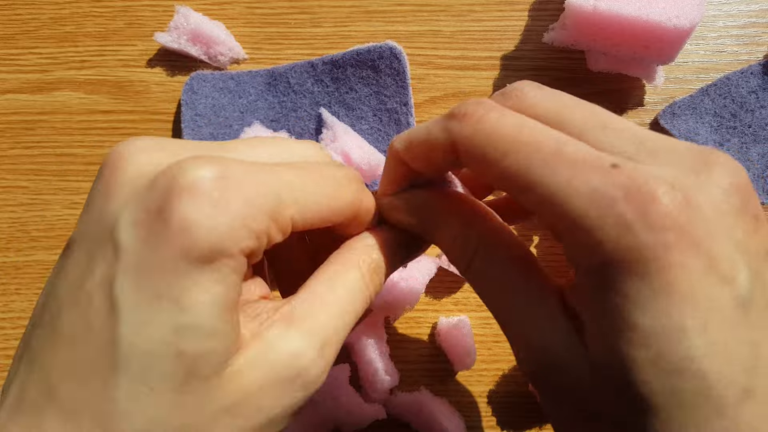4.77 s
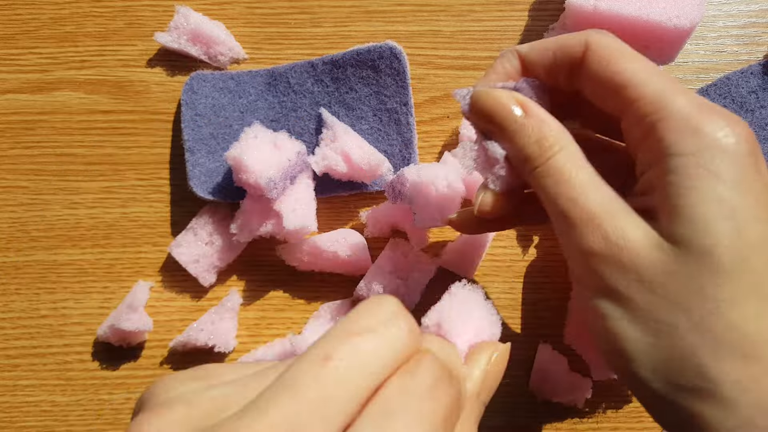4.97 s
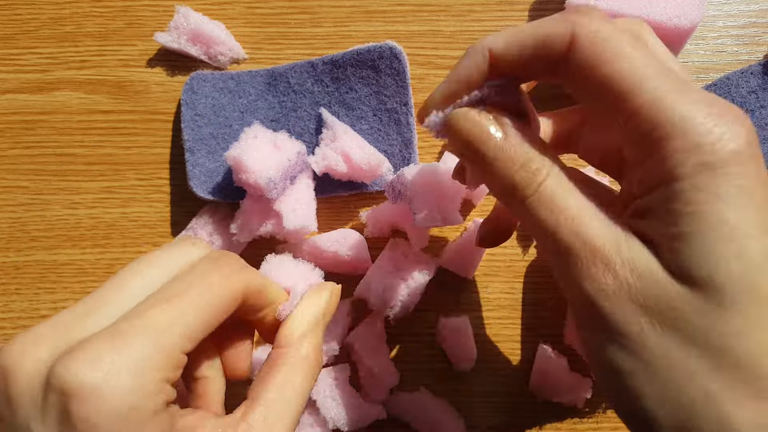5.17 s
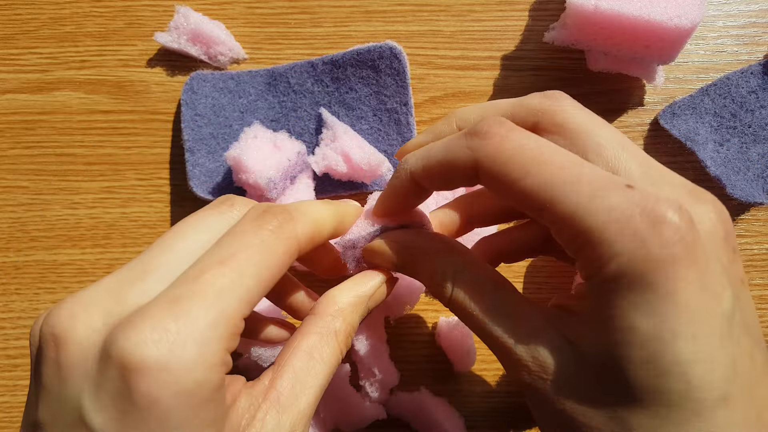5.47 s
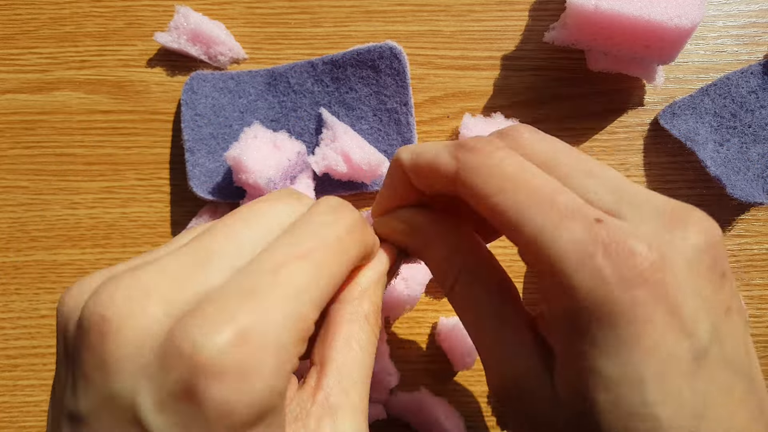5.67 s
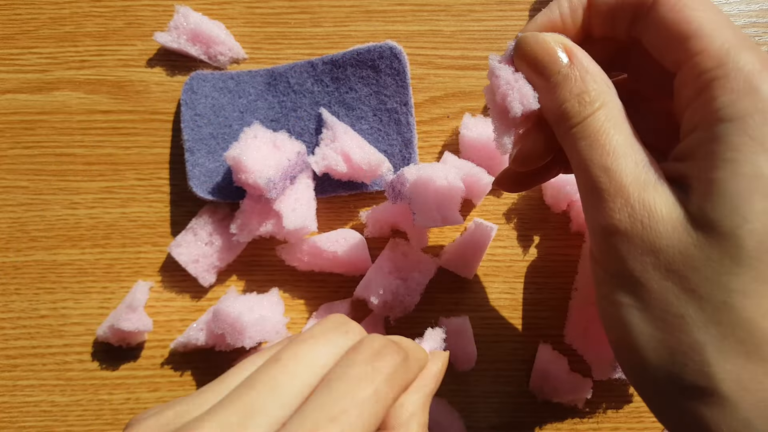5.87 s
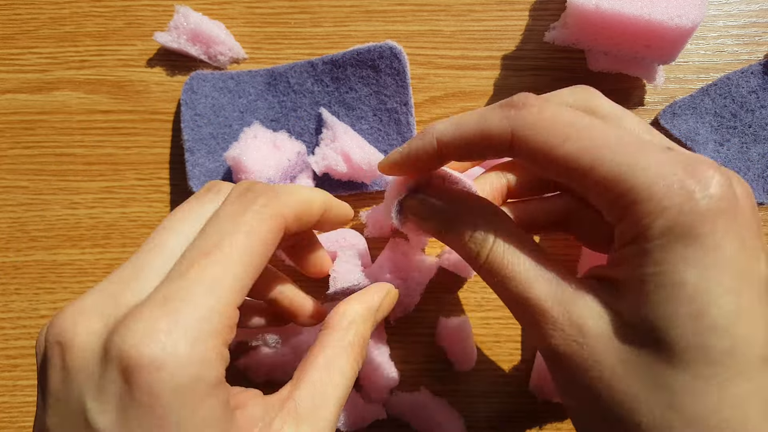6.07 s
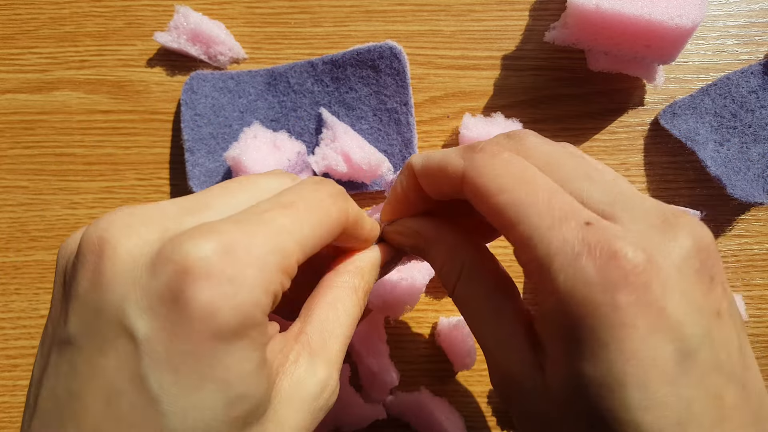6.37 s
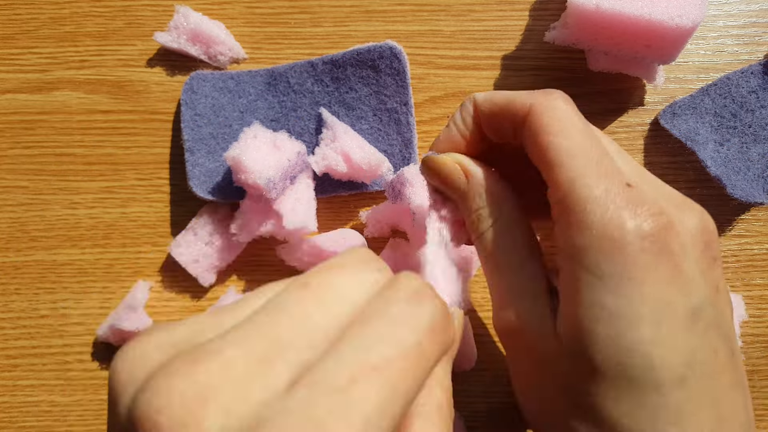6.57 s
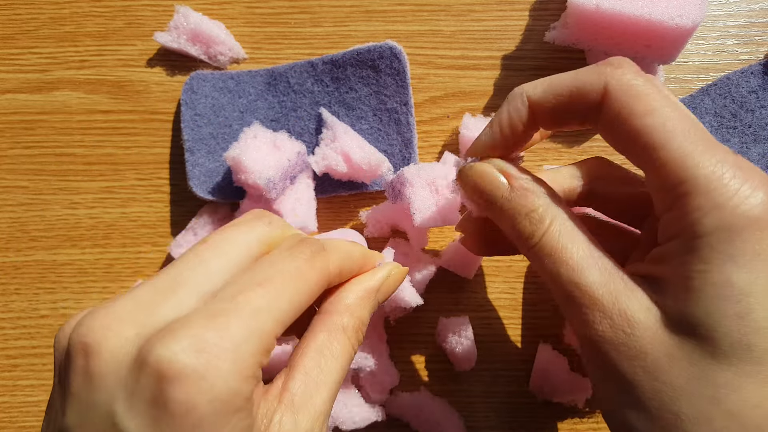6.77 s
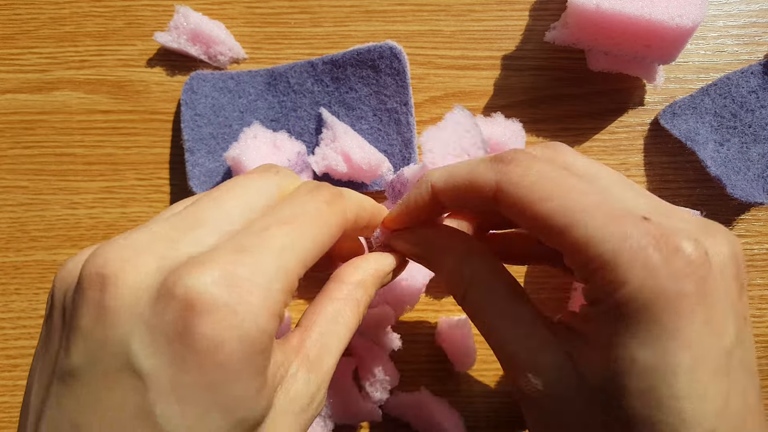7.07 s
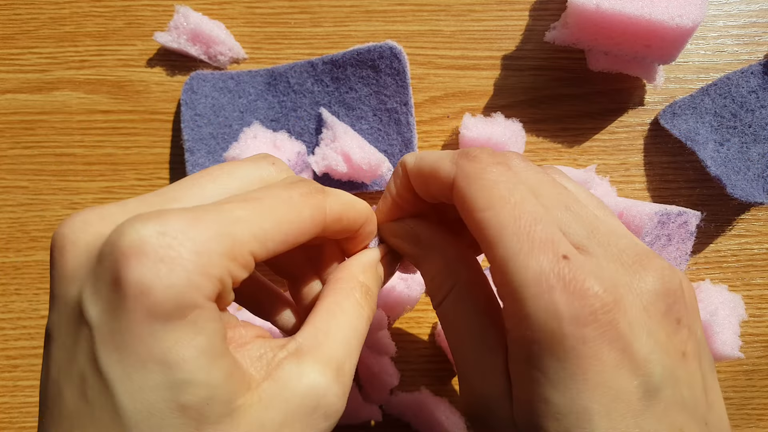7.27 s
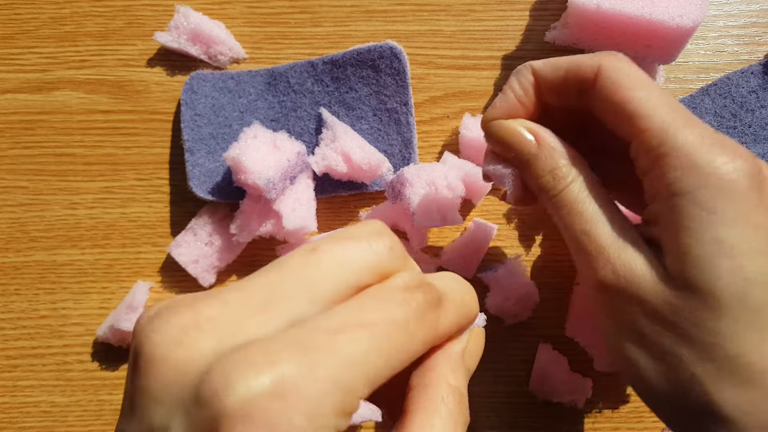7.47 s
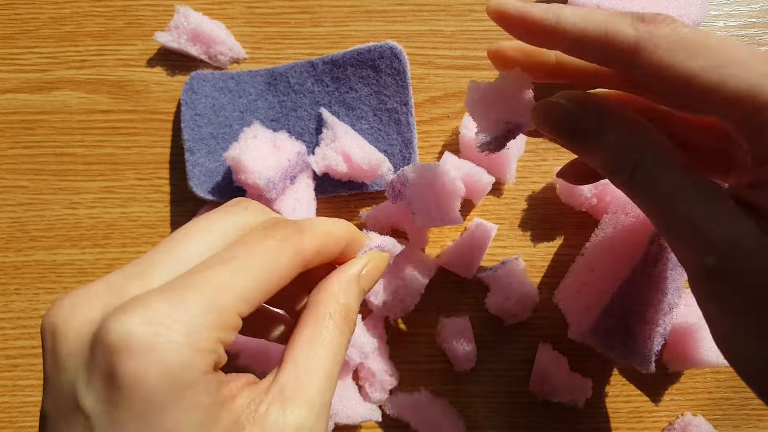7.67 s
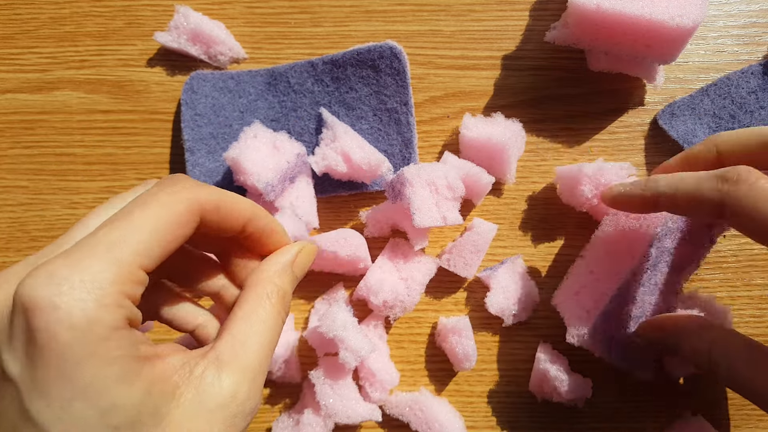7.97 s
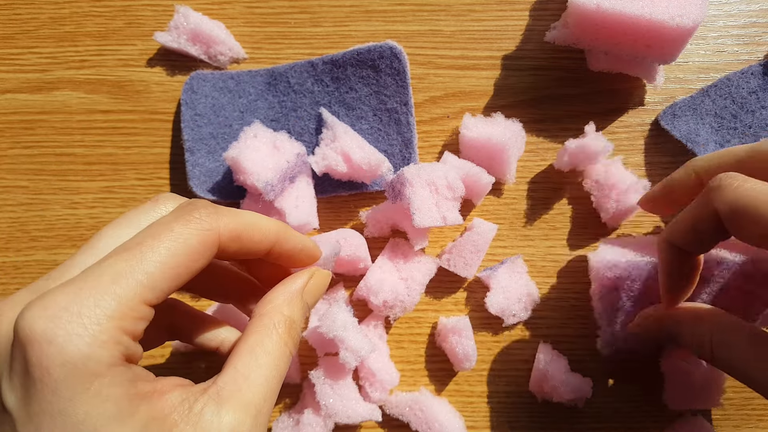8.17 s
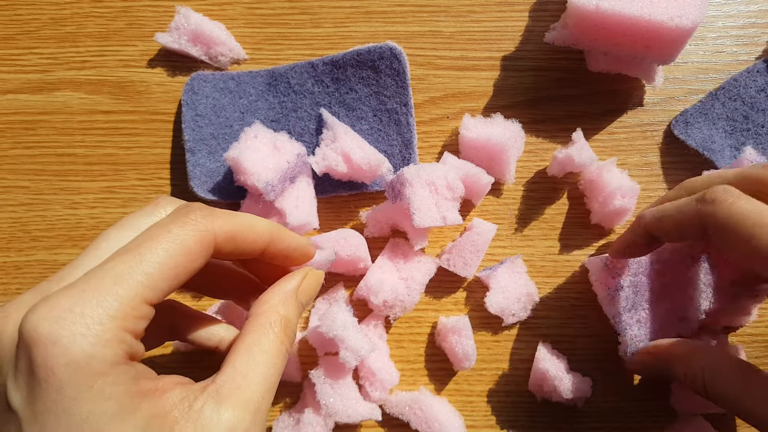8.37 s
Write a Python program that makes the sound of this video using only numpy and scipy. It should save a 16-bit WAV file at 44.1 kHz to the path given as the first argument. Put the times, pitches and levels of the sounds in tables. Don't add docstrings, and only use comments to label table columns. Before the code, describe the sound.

Very close stereo microphone in a small quiet room. Hands tear dry sponge foam: a cluster of loud, coarse rips comes first, each a dense crackle of snapping cells closing with a low dull pop. Later rips are shorter, brighter and more spaced out. Between them fingers squeeze, rustle and lightly tap the pieces. Faint hiss and a distant low motor hum stay underneath.

```python
import sys
import numpy as np
from scipy import signal
from scipy.io import wavfile

SR = 44100
rng = np.random.default_rng(int(sys.argv[2]) if len(sys.argv) > 2 else 0)


def to_wav(sig):
    pcm = np.clip(np.atleast_2d(sig), -1, 1) * 32767
    pcm = np.round(pcm).astype(np.int16)
    wavfile.write(sys.argv[1], SR, pcm.T)


def rack_gain(trim_db):
    fader = np.asarray(trim_db, float)
    return 10 ** (fader / 20)


N = 376173

# f/Hz, level/dB
HISS_SPECTRUM = [(12, -29), (20, -18), (44, -11), (101, -9), (176, -16.5), (267, -16), (395, -18.5),
                 (815, -21), (5270, -32), (9200, -37), (10600, -35), (13200, -37), (15600, -31)]
HISS_DB = -52.5
# f/Hz, correlation/1
HISS_LIKENESS = [(60, 0.78), (240, 0.084), (950, -0.0088), (3770, -0.35), (15000, -0.13)]
# t/s, f/Hz, level/dB
MOTOR = [(2.5, 124, -68), (2.8, 124, -58), (3.9, 122, -57), (4.1, 111, -59), (4.45, 108, -60),
         (4.65, 113, -57), (4.8, 112, -75), (5.75, 107, -68), (6.1, 124, -56), (6.3, 115, -55),
         (6.55, 116, -54), (6.9, 127, -59), (7.25, 109, -60), (7.5, 102, -68), (7.8, 116, -56),
         (8.0, 121, -61), (8.25, 111, -55), (8.53, 126, -57)]
# f/Hz, width/Hz, level/dB
DRONES = [(44.2, 4, -60), (90.5, 2.5, -60), (262, 30, -63)]
ROOM_T60_S, ROOM_DB, WALL_CUT_HZ = 0.26, -23, 14500
# f/Hz, width/Hz, boost/dB
HOLLOWS = [(797, 64, -12), (1100, 24, -20), (2210, 46, 1), (2772, 100, -2), (3570, 26, -0.5),
           (4200, 37, -5), (4800, 85, -7), (8560, 1950, -8.5)]

# f/Hz, level per Hz/dB
CRACKLE_SPECTRUM = [(65, -18.5), (110, -5), (270, 2.5), (375, -3.5), (576, 3.5), (803, 7), (1010, 5.5),
                    (2210, -7), (2510, -11.5), (2840, -3.5), (3870, -5.5), (4120, -7.5), (5170, -9.5),
                    (12100, -10), (15500, -4.5)]
REGISTERS_HZ = [15500, 4500, 1400, 600, 85]
PATH_SPREAD = [0.93, 1, 1.8, 3.0]
STRUCK_SHARE = [.6, .2, .15, 0.25]

# t at full strength/s, rise/s, hold/s, level/dB, darkness/dB
RUSTLES = [(0.0, .011, .002, -49.5, 10.5), (.84, 0.037, 0.066, -64.5, 8.5), (1.255, 0.083, 0.018, -63, 8.5),
           (1.492, 0.024, 0.015, -50, 3.5), (1.54, 0.028, 0.066, -52.5, 6), (2.39, 0.068, .005, -55, 1),
           (2.49, 0.032, 0.012, -53.5, -3.5), (2.745, 0.013, 0.065, -57, 9), (2.86, 0.037, 0.025, -63, 12),
           (3.54, 0.052, 0.0059, -56, 3.5), (3.68, 0.016, 0.042, -58, 14.5),
           (4.35, 0.084, 0.0088, -61, 7.5), (4.45, 0.065, 0.0038, -56.5, 4),
           (4.615, 0.031, 0.0085, -57, 5.5), (4.68, 0.038, 0.037, -54, 3.5), (5.35, .031, 0.0093, -69, 5),
           (5.52, 0.063, 0.11, -59.5, 8.5), (6.26, 0.032, 0.064, -61, 5), (6.88, 0.019, 0.034, -53, -3),
           (6.98, .021, .005, -56, 2), (7.084, 0.019, 0.0046, -58.5, 6.5), (8.1, 0.02, .005, -65, 0),
           (8.33, 0.014, 0.019, -60, 5), (8.41, 0.012, 0.17, -59.5, 10.5)]
# t at full strength/s, rise/s, hold/s, level/dB, darkness/dB
GRIPS = [(.106, 0.021, 0.042, -61.5, 6.5), (.99, 0.055, .005, -54.5, 0), (1.055, 0.05, 0.023, -52, -0.5),
         (1.72, 0.11, 0.18, -57, -1), (2.95, 0.097, 0.2, -62.5, 0), (3.37, 0.036, 0.039, -46.5, -5),
         (3.455, 0.036, 0.0087, -55.5, 1), (3.78, 0.059, 0.063, -59, -1), (4.155, 0.087, 0.053, -53.5, -15),
         (4.22, 0.025, 0.036, -49.5, -5), (4.89, 0.18, 0.0036, -52, -10), (5.235, 0.033, 0.068, -48.5, -4),
         (5.74, 0.073, 0.067, -53.5, -13), (6.045, 0.021, 0.055, -48, -4), (6.45, 0.16, 0.23, -56, -3),
         (6.845, 0.03, .002, -41.5, -7.5), (7.3, 0.07, 0.18, -58, -5.5), (7.692, 0.0081, 0.0059, -43, -8),
         (7.755, 0.0072, 0.0076, -47.5, -14.5), (8.172, 0.034, 0.042, -49, -0.5)]
# share/1, offset/dB
RUSTLE_DARKENING = [(0.051, 1.5), (0.44, -0.16), (0.89, -2), (0.71, -5)]
# share/1, offset/dB
GRIP_DARKENING = [(0.072, 0), (0.94, 0.5), (0.76, -3), (0.99, -3)]
SETTLE_DB_PER_S, RESTING_DB = 330, -69

# t/s, peak level/dB, f/Hz
TAPS = [(1.045, -36, 1090), (1.492, -37, 825), (2.391, -38, 786), (2.475, -42, 1100), (2.499, -54, 740),
        (2.746, -37.5, 510), (2.795, -35, 886), (3.394, -26, 780), (3.695, -35.5, 1160), (4.612, -47, 1140),
        (4.71, -40, 880), (5.544, -37, 1010), (5.595, -36, 1140), (5.627, -29, 1200), (6.108, -35, 900),
        (6.18, -37.5, 930), (6.843, -32, 856), (6.973, -35.5, 1100), (7.08, -39, 1100), (7.379, -38.5, 644),
        (8.413, -49, 730)]
# t/s, length/s, level/dB, f/Hz
SQUEAK = [(.109, .035, -54, 4200)]
# t/s, length/s, level/dB, f/Hz
RUBS = [(0.692, 0.0045, -45, 3600), (0.828, 0.02, -55, 2490), (0.854, 0.012, -50, 2200),
        (0.875, 0.033, -57, 2250), (1.49, 0.026, -49, 1170), (1.492, 0.0085, -45, 1940),
        (1.509, 0.005, -42, 1960), (1.519, 0.011, -50, 1170), (1.594, 0.017, -54, 1170),
        (1.759, 0.022, -46, 13200), (2.387, 0.01, -56, 2780), (2.39, 0.0065, -48, 1270),
        (2.473, 0.0073, -52, 1070), (2.737, 0.028, -44.5, 503), (2.755, 0.01, -48, 810),
        (2.786, 0.026, -49, 1170), (2.876, 0.011, -50, 900), (3.366, 0.013, -41, 13200),
        (3.367, 0.01, -50, 8560), (3.678, 0.042, -45, 1100), (4.237, 0.014, -50, 1170),
        (4.612, 0.006, -50, 3050), (4.612, 0.03, -48.5, 1190), (4.688, 0.004, -48, 4670),
        (4.688, 0.004, -53, 2770), (4.696, 0.036, -47, 895), (5.306, 0.0057, -56, 3630),
        (5.523, 0.031, -49, 1080), (5.589, 0.02, -52, 1190), (5.614, 0.007, -50, 3350),
        (5.624, 0.012, -47, 1180), (5.767, 0.005, -48, 12110), (5.773, 0.005, -54, 2800),
        (6.106, 0.011, -53, 820), (6.514, 0.004, -51, 8560), (6.72, 0.067, -54.5, 2280),
        (7.428, 0.004, -57.5, 8560), (7.755, 0.012, -54, 7000), (7.757, 0.007, -45, 13200),
        (8.165, 0.077, -49, 2760), (8.311, 0.006, -53, 2510), (8.44, 0.03, -44.5, 734),
        (8.458, 0.013, -46.5, 2760), (6.845, 0.067, -51, 820), (6.97, .035, -55, 1100),
        (7.072, .025, -58, 1060)]
# t/s, length/s, level/dB, f/Hz
STRANDS = [(0.17, 0.029, -34, 3670), (0.222, 0.028, -26.5, 500), (0.244, 0.026, -25, 2160),
           (0.254, 0.024, -27.5, 820), (0.268, 0.024, -26, 2840), (0.537, 0.058, -32, 3560),
           (0.56, 0.016, -26.5, 2840), (0.731, 0.024, -37, 8560), (0.762, 0.0084, -11, 830),
           (0.763, 0.007, -37, 8560), (0.764, 0.0046, -26, 4750), (0.766, 0.0039, -15.5, 2000),
           (1.832, 0.01, -31, 2820), (1.854, 0.035, -28, 2140), (1.855, 0.018, -25, 693),
           (1.883, 0.028, -27, 767), (1.884, 0.028, -27.5, 1470), (1.935, 0.0054, -36, 5090),
           (2.006, 0.023, -30, 1150), (2.058, 0.016, -23, 2900), (2.062, 0.025, -49, 9340),
           (2.08, 0.0069, -21, 855), (2.082, 0.006, -20.5, 1750), (2.082, 0.006, -21, 3520),
           (3.11, 0.015, -30, 7460), (3.134, 0.012, -30, 9300), (3.146, 0.027, -30.5, 4280),
           (3.162, 0.01, -25.5, 990), (3.167, 0.014, -28.5, 2200), (3.171, 0.018, -26.5, 451),
           (3.891, 0.005, -28.5, 4530), (3.907, 0.007, -24, 7750), (3.919, 0.0065, -25, 2850),
           (3.919, 0.012, -24, 4500), (3.943, 0.036, -28, 2730), (3.96, 0.0066, -23, 1510),
           (3.974, 0.012, -23.5, 1230), (4.975, 0.012, -24, 9150), (4.977, 0.012, -35, 4720),
           (5.012, 0.045, -33, 6900), (5.04, 0.0074, -29.5, 820), (5.046, 0.0077, -30, 2710),
           (5.864, 0.014, -35, 2840), (5.862, 0.015, -26, 1080), (6.615, 0.012, -37, 7850),
           (6.662, 0.022, -38, 8560), (6.679, 0.0067, -27, 1080), (6.842, 0.022, -42, 12110),
           (7.516, 0.0061, -32.5, 1560)]

# t/s, peak level/dB, f/Hz
SNAPS = [(0.1575, -17, 3540), (0.1708, -23, 3920), (0.178, -16, 3420), (0.216, -7, 1810), (0.231, -7, 1950),
         (0.3099, -14, 2600), (0.4586, -27, 2970), (0.4675, -30, 1100), (0.5369, -11, 3570),
         (0.7175, -29, 3500), (0.7327, -10.5, 2660), (1.4927, -28, 2040), (1.784, -18, 11500),
         (1.797, -6, 11500), (1.81, -8, 8850), (2.0834, -0.5, 2700)]
# t/s, peak level/dB, f/Hz
CHUNK_SNAPS = [(3.0941, -27, 9390), (3.107, -19, 9610), (3.1237, -2, 9340), (3.8723, -20, 6470),
               (3.8826, -4.5, 11600), (3.8925, -8, 9600), (4.9219, -21, 11500), (4.9387, -21, 9220),
               (4.959, -20.5, 9230), (4.963, -5, 9230), (4.9778, 0, 9300), (5.767, -23, 9150),
               (5.7937, -16, 9150), (5.8076, -2, 11500), (5.811, -19, 9500), (5.82, -7, 9500),
               (5.831, -4.5, 9100), (6.4435, -18.5, 9500), (6.478, -25, 9060), (6.5146, -22, 8540),
               (6.538, -18.5, 8800), (6.5622, -25, 10100), (6.5745, -28, 9500), (6.5814, -13, 10200),
               (6.591, -19, 7800), (6.6214, -4, 9900), (6.8425, -8, 11400), (7.4098, -29, 8500),
               (7.4288, -26, 7800), (7.441, -33, 9500), (7.448, -35, 9000), (7.4641, -14, 9500),
               (7.494, -21, 3580), (7.693, -15.5, 7750)]
# t/s, peak level/dB, centre f/Hz
CRACKS = [(.193, -26, 890), (.4436, -26, 1800), (.485, -24.5, 3000), (5.788, -29.5, 2000),
          (.6928, -21, 3500), (.7666, -1, 1800), (.7678, -10, 1000), (1.9926, -20, 2500),
          (2.0073, -21, 1200), (2.0462, -20, 1400), (2.475, -41, 1500), (3.9204, -2, 4700),
          (4.612, -29, 2010), (5.738, -31, 2500), (5.854, -14, 795), (6.0435, -24.5, 2000),
          (6.539, -31, 2400), (7.4288, -31, 3500), (7.4387, -34, 2000), (7.456, -26, 2000),
          (8.098, -34.5, 2700)]
TICK_ATTACK_S = 0.00021

# t/s, peak level/dB, f/Hz, relative knock level/dB, ring t60/s
POPS = [(0.7675, -1.5, 223, -31, 0.033), (0.7684, -8, 331, -23.5, 0.031), (1.851, -27, 129.4, -19.5, 0.043),
        (1.915, -28, 168, -20, 0.083), (1.936, -23, 248, -10, 0.046), (0.306, -22, 380, -10, 0.022),
        (1.8856, -18.5, 192, 6, 0.019), (2.018, -15.5, 190, -20, 0.054), (2.049, -17.5, 158, -3, 0.088),
        (2.063, -16, 318, -14, 0.077), (2.085, -4, 207, -22, 0.023), (2.74, -41.5, 272, -7, 0.09),
        (3.181, -20, 328, -19, 0.023), (3.184, -21.5, 140, -22, 0.03), (3.979, -22, 286, 0.5, 0.029),
        (4.011, -31, 185, -5, 0.049), (4.267, -38, 224, -7, 0.051), (5.047, -25, 240, 8, 0.029),
        (5.868, -37, 320, 5, 0.049), (6.68, -36, 270, 7, 0.034), (6.682, -37, 162, -16, 0.05),
        (7.533, -41.5, 386, 19.5, 0.028), (8.098, -41.5, 167, -4, 0.071), (8.324, -27.5, 240, -23, 0.039),
        (8.339, -25, 235, -22.5, 0.036), (8.326, -33, 404, -20, 0.033)]
POP_LAG_S = 0.00022
ROCK_DB, ROCK_HZ = -2, 140

# t at full strength/s, build-up/s, flap loose after/s, hold/s, level/dB
RIPS = [
    (.172, 0.015, 0.029, 0.049, -33.5),
    (.235, 0.073, -0.01, 0.08, -22.5),
    (0.459, 0.063, 0.031, 0.012, -36),
    (0.486, 0.0034, 0.011, 0.015, -36.5),
    (0.554, 0.077, -0.014, 0.057, -27.5),
    (.719, 0.015, 0.012, 0.054, -29),
    (1.821, 0.032, 0.043, 0.13, -25.5),
    (2.012, 0.041, -0.034, 0.082, -29.5),
    (2.068, 0.11, -0.042, 0.011, -22.5),
]
# t at full strength/s, build-up/s, flap loose after/s, hold/s, level/dB
CHUNK_RIPS = [
    (3.108, 0.02, 0.069, 0.074, -24.5),
    (3.884, 0.0036, 0.11, 0.047, -29),
    (3.919, 0.019, 0.058, 0.06, -24),
    (4.975, 0.034, 0.056, 0.07, -24.5),
    (5.808, 0.023, 0.12, 0.073, -28.5),
    (6.622, 0.075, 0.054, 0.057, -27.5),
    (7.49, 0.038, 0.053, 0.042, -30.5),
]
# delay/s, climb rate/(dB/s), deepest level/dB, loose level/dB
LOOSENING = [(-.022, 400, -8, -3.5), (0.001, 350, -19, -7), (.01, 580, -10, -5.5)]
# delay/s, climb rate/(dB/s), deepest level/dB, loose level/dB
CHUNK_LOOSENING = [(-.045, 600, -6.5, -6), (0.001, 328, -14.5, -6.5), (0.015, 900, -27, -3.5)]
# t/s, level/dB, relative low push level/dB
JERKS = [
    (0.7627, -23, 0.5),
    (2.083, -27, 1.5),
    (3.172, -29.5, -5),
    (3.976, -32.5, -8),
    (5.041, -33.5, -8),
    (5.855, -33, -21),
    (5.867, -32.5, -4),
    (6.679, -35, 4.5),
    (7.53, -49, 4),
]
JERK_COLOUR_DB = [-1, 2.5, 2]
JERK_S, JERK_RISE_DB_PER_S, JERK_FALL_DB_PER_S = 0.0061, 2000, 1003
BUILD_DB, LEAD_DB, LEAD_DB_PER_S, SAG_DB_PER_S = 21.5, 23.5, 123, 19.5
LET_GO_DB_PER_S, TAIL_DB, TAIL_DB_PER_S = 1100, 36, 202

CUTOFF_HZ = 16250


def rms_one(x):
    return x / np.sqrt(np.mean(x ** 2) + 1e-20)


def at_hz(points, hz):
    f, level = np.array(points).T
    return np.interp(np.log(hz), np.log(f), level)


def louder(levels_db, new_db):
    return 10 * np.log10(rack_gain(2 * levels_db) + rack_gain(2 * new_db))


def drift(rate):
    r = np.exp(-40 * np.pi * rate / SR)
    slow = signal.lfilter([1], [1, -2 * r, r * r], rng.standard_normal(N // 20 + 2002))[2000:]
    return np.interp(np.arange(N) / 20, np.arange(len(slow)), rms_one(slow))


def ring(clicks, hz, t60):
    r, w = rack_gain(-60 / (t60 * SR)), 2 * np.pi * hz / SR
    return signal.lfilter([0, np.sin(w)], [1, -2 * r * np.cos(w), r * r], clicks + 1e-18)


def band(x, low_hz, high_hz):
    return signal.sosfilt(signal.butter(2, [low_hz, high_hz], "band", fs=SR, output="sos"), x)


def hiss():
    out, white = 0, rng.standard_normal((2, 2, N))
    edges = 20 * 2 ** np.arange(0, 10.2, .5)
    for k, (low, high) in enumerate(zip(edges, edges[1:])):
        mid, side = band(white[k % 2], low, high)
        hz = np.sqrt(low * high)
        alike = np.clip(at_hz(HISS_LIKENESS, hz), -1, 1)
        gain = rack_gain(at_hz(HISS_SPECTRUM, hz) + 2.5 * drift(3.6))
        out = out + gain * (np.sqrt(1 + alike) * mid + np.sqrt(1 - alike) * side * [[1], [-1]])
    return rack_gain(HISS_DB) * rms_one(out)


def machines():
    s, hz, level_db = np.transpose(MOTOR)
    t = np.arange(N) / SR
    phase = 2 * np.pi * np.cumsum(np.interp(t, s, hz)) / SR
    motor_db = np.interp(t, s, level_db, left=-80) + 2.9 * drift(2.2)
    out = rack_gain(motor_db) * np.sin(phase)
    for centre_hz, width_hz, drone_db in DRONES:
        t60 = np.log(1000) / (np.pi * width_hz)
        out = out + rack_gain(drone_db) * rms_one(ring(rng.standard_normal(N), centre_hz, t60))
    return out


def room(x):
    out, dull = np.zeros((2, N)), np.exp(-2 * np.pi * WALL_CUT_HZ / SR)
    lags = (rng.uniform(0.013, 0.044, 12) * SR).astype(int)
    for k, lag in enumerate(lags):
        loop, gain, state = x.copy(), rack_gain(-60 * lag / SR / ROOM_T60_S), [0.]
        for i in range(lag, N, lag):
            back, state = signal.lfilter([gain * (1 - dull)], [1, -dull], loop[i - lag:i], zi=state)
            loop[i:i + lag] += back[:N - i]
        out[k % 2] += (loop - x) * (-1) ** (k // 2)
    return out


def hollows(x, shift_db):
    out = x.copy()
    for hz, width_hz, boost_db in HOLLOWS:
        r, w = np.exp(-np.pi * width_hz / SR), 2 * np.pi * hz / SR
        poles = [1, -2 * r * np.cos(w), r * r]
        narrow = signal.lfilter([(1 - r * r) / 2, 0, (r * r - 1) / 2], poles, x)
        out += rack_gain(boost_db + shift_db * drift(6.5)) * narrow
    return out


def handling():
    t, out = np.arange(0, N + 32, 32) / SR, RESTING_DB
    for touches, darkening in [(GRIPS, GRIP_DARKENING), (RUSTLES, RUSTLE_DARKENING)]:
        share, offset_db = np.transpose(darkening)[:, :, None]
        for s, rise_s, held_s, level_db, dark_db in touches:
            rise_db = 10 * np.maximum(s - t, 0) / np.clip(rise_s, .005, .15)
            settle_db = SETTLE_DB_PER_S * np.maximum(t - s - held_s, 0)
            top_db = level_db - rise_db - settle_db
            out = louder(out, top_db + dark_db * share + offset_db)
    return [np.interp(np.arange(N) / SR, t, row) for row in out]


def strands(events, per_s, cycles, edge_s, gain_db):
    out, t = np.zeros((2, N + 5000)), np.arange(5000) / SR
    born = rng.random((len(events), 5000))
    sizes = rng.standard_normal((len(events), 3, 5000))
    port_gain = rack_gain(np.array([[.6], [-.6]]))
    for (s, length_s, level_db, hz), dice, (mid, left, right) in zip(events, born, sizes):
        snaps = (dice < per_s / SR) * (mid + 0.5e-4 * hz * np.array([left, right]))
        sung = rms_one(ring(ring(snaps, hz, cycles / hz), hz, cycles / hz))
        fall_db = 6.0 * np.maximum(t - edge_s - length_s, 0) / edge_s
        shape = np.clip(t / edge_s, 0, 1) * rack_gain(-fall_db)
        i = round((s - edge_s) * SR)
        out[:, i:i + 5000] += rack_gain(level_db + gain_db) * shape * sung * port_gain
    return out[:, :N]


def ticks(events, cycles, puff_share, puff_t60, gain_db):
    out, t = np.zeros((2, N + 1200)), np.arange(1200) / SR
    chance = rng.standard_normal((len(events), 2, 1200))
    attack, port_gain = 1 - np.exp(-t / TICK_ATTACK_S), rack_gain(np.array([[.7], [-.7]]))
    for (s, peak_db, hz), puff in zip(events, chance):
        tick = np.sin(2 * np.pi * hz * t) * rack_gain(-60 * t * hz / cycles)
        torn = puff_share * band(puff, hz / 1.43, 13700) * rack_gain(-60 * t / puff_t60)
        i = round(s * SR)
        out[:, i:i + 1200] += rack_gain(peak_db + gain_db) * port_gain * (tick + torn) * attack
    return out[:, :N]


def pops():
    out, t = np.zeros(N + 4000), np.arange(4000) / SR
    chance = rng.standard_normal((len(POPS), 4000))
    swell = 1 - np.exp(-t / 0.0036)
    for (s, peak_db, hz, knock_db, t60), rough in zip(POPS, chance):
        modes = np.sin(2 * np.pi * hz * t) + 0.13 * np.sin(2 * np.pi * 1.476 * hz * t)
        swing = modes * swell * rack_gain(-60 * t / t60)
        knock = rms_one(band(rough, 380, 3300)) * rack_gain(knock_db - 4.0 - 60 * t / 0.015)
        i = round(s * SR)
        out[i:i + 4000] += rack_gain(peak_db + 4.0) * (swing + knock)
    return out[:N]


def two_ports(at, sizes, lag, left_db):
    out = np.zeros((2, N))
    left_at = np.clip(at + np.round(lag).astype(int), 0, N - 1)
    np.add.at(out[0], left_at, sizes * rack_gain(left_db / 2))
    np.add.at(out[1], at, sizes * rack_gain(-left_db / 2))
    return out


def tearing():
    t, out = np.arange(0, N + 32, 32) / SR, -120.
    for rips, loosening in [(RIPS, LOOSENING), (CHUNK_RIPS, CHUNK_LOOSENING)]:
        for s, build_s, loose_s, held_s, level_db in rips:
            before, after = np.maximum(s - t, 0), np.maximum(t - s - held_s, 0)
            rise_db = np.minimum(BUILD_DB * before / max(build_s, 1e-3), LEAD_DB + LEAD_DB_PER_S * before)
            fall_db = np.minimum(LET_GO_DB_PER_S * after, TAIL_DB + TAIL_DB_PER_S * after)
            sag_db = SAG_DB_PER_S * np.clip(t - s, 0, held_s)
            top_db = level_db - rise_db - fall_db - sag_db
            lows = [loose_db + np.clip(climb * (t - s - loose_s - late_s), deep_db, 0)
                    for late_s, climb, deep_db, loose_db in loosening]
            out = louder(out, top_db + np.array([0 * t] + lows))
    for s, level_db, push_db in JERKS:
        rise_db = JERK_RISE_DB_PER_S * np.maximum(s - t, 0)
        fall_db = JERK_FALL_DB_PER_S * np.maximum(t - s - JERK_S, 0)
        colour_db = np.array(JERK_COLOUR_DB + [push_db])[:, None]
        out = louder(out, level_db - rise_db - fall_db + colour_db)
    return [np.interp(np.arange(N) / SR, t, row) for row in out]


def foam(levels_db, per_s, uneven_db, clump_db, patchy_db, cycles, spread_db):
    rate = per_s * rack_gain(clump_db * drift(70))
    at = np.flatnonzero(rng.random(N) < rate / SR)
    strength = rack_gain(uneven_db * np.minimum(rng.exponential(1, len(at)), 5))
    sizes = strength * rng.choice([-1, 1], len(at))
    spot = rng.normal(0, 3.0, len(at))
    left_db = rng.normal(1.24, spread_db, len(at))
    out = np.zeros((2, N))
    for k, level_db in enumerate(levels_db):
        high_hz, low_hz, pores = REGISTERS_HZ[k], REGISTERS_HZ[k + 1], 0
        for hz in np.geomspace(low_hz, high_hz, 13)[1::2]:
            hit = rng.random(len(at)) < STRUCK_SHARE[k]
            struck = sizes * hit * rack_gain(patchy_db * drift(16.2)[at])
            clicks = two_ports(at, struck, PATH_SPREAD[k] * spot - 2.5, left_db)
            pore = rms_one(ring(clicks, hz, cycles / hz))
            pores = pores + pore * rack_gain(at_hz(CRACKLE_SPECTRUM, hz)) * np.sqrt(hz)
        steep = band(band(pores, low_hz, high_hz), 0.65 * low_hz, 1.32 * high_hz)
        out += rack_gain(level_db) * rms_one(steep)
    return out


def scene():
    background = hiss() + machines()
    rustles = foam(handling(), per_s=7000, uneven_db=2.0, clump_db=2.5, patchy_db=4.0, cycles=3.2, spread_db=5.5)
    taps = ticks(TAPS, cycles=12.0, puff_share=0.43, puff_t60=0.047, gain_db=-2.0)
    squeak = strands(SQUEAK, per_s=1900, cycles=40.0, edge_s=0.0046, gain_db=3.5)
    rubs = strands(RUBS, per_s=2500, cycles=8.8, edge_s=.003, gain_db=-2.5)
    sung = strands(STRANDS, per_s=4000, cycles=13.0, edge_s=.002, gain_db=-4.0)
    snaps = ticks(SNAPS + CHUNK_SNAPS, cycles=20.0, puff_share=0.38, puff_t60=0.032, gain_db=-7.0)
    cracks = ticks(CRACKS, cycles=4.7, puff_share=0.27, puff_t60=0.0084, gain_db=3.0)
    pop, t = pops(), np.arange(N) / SR
    pushed = np.array([pop, np.interp(t - POP_LAG_S, t, pop)]) * rack_gain(np.array([[-.8], [.8]]))
    rips = foam(tearing(), per_s=9000, uneven_db=2.0, clump_db=3.0, patchy_db=3.5, cycles=11.2, spread_db=8.0)

    torn = hollows(rack_gain(-0.37) * rips + snaps + cracks, shift_db=1.5)
    touched = hollows(rack_gain(-0.32) * rustles, shift_db=-1.0)
    hands = torn + touched + taps + squeak + rubs + sung + pushed
    middle = hands.mean(axis=0)
    rocking = signal.sosfilt(signal.butter(3, ROCK_HZ, fs=SR, output="sos"), middle)
    return hands + rack_gain(ROCK_DB) * rocking * [[-1], [1]] + rack_gain(ROOM_DB) * room(middle) + background


def top_cut(x):
    return signal.sosfilt(signal.butter(12, 15780, fs=SR, output="sos"), x)


def record(dry):
    cut = signal.sosfilt(signal.butter(2, 36, "high", fs=SR, output="sos"), dry)
    clipped = np.clip(cut, -1, 1)
    mix = signal.sosfilt(signal.cheby2(14, 50, CUTOFF_HZ, fs=SR, output="sos"), clipped) - .0024
    return top_cut(mix)


dry = scene()
out = record(dry)
to_wav(out)
```